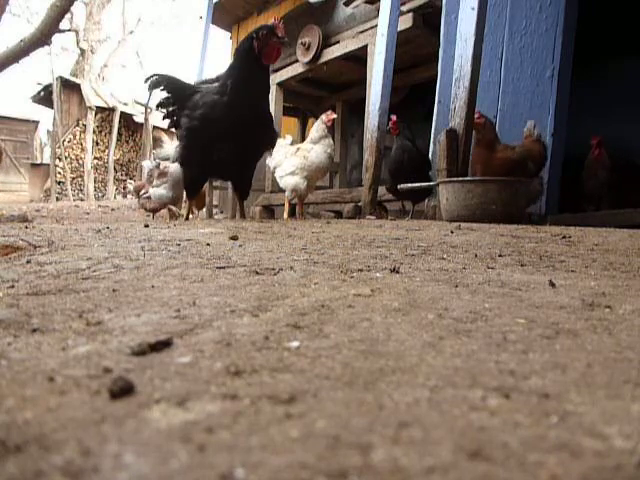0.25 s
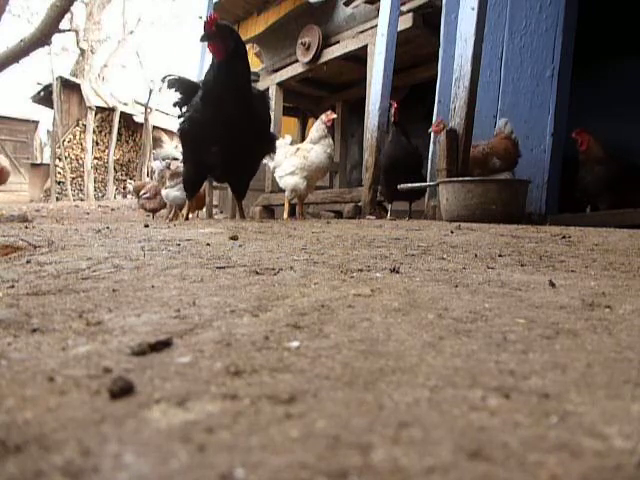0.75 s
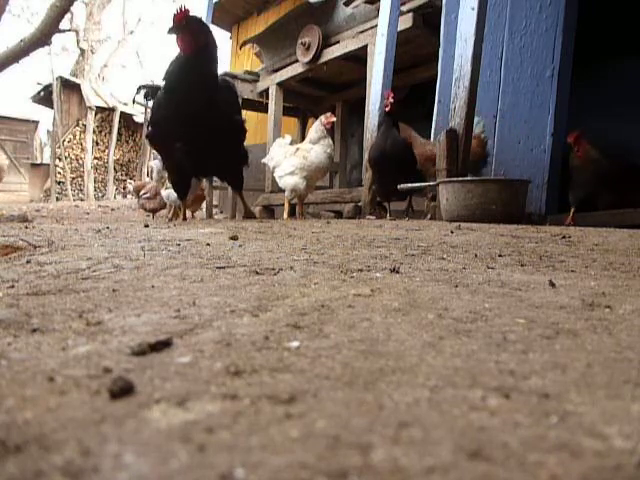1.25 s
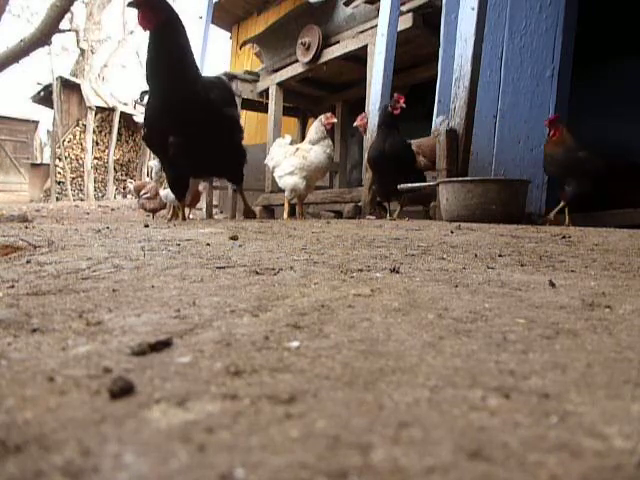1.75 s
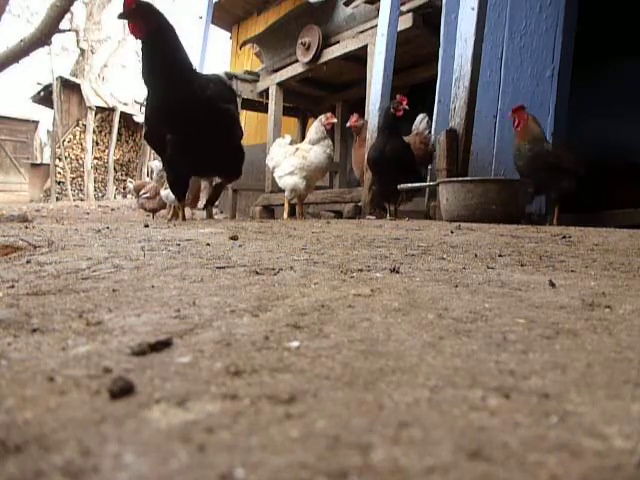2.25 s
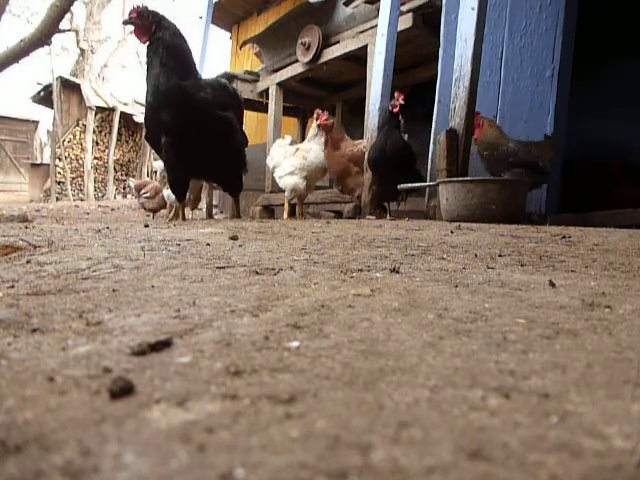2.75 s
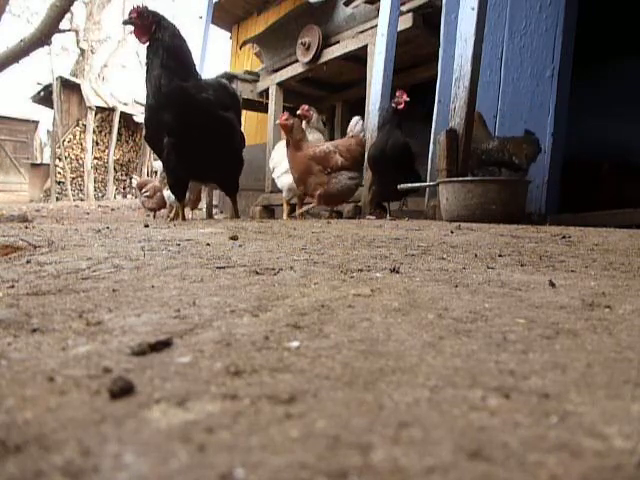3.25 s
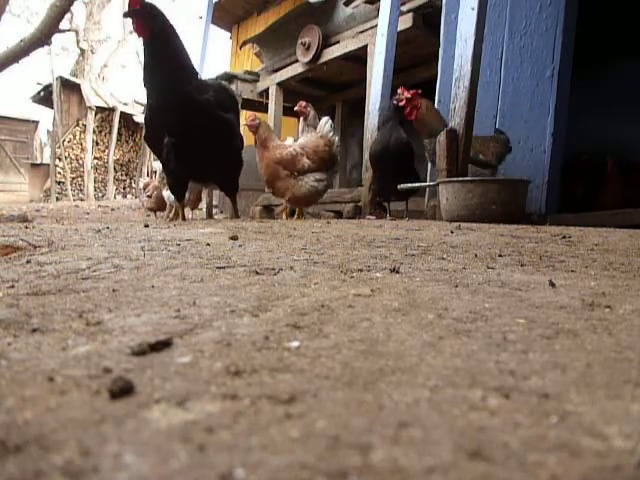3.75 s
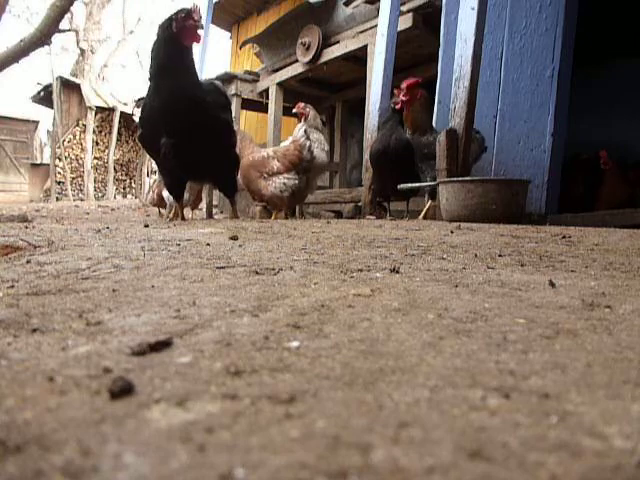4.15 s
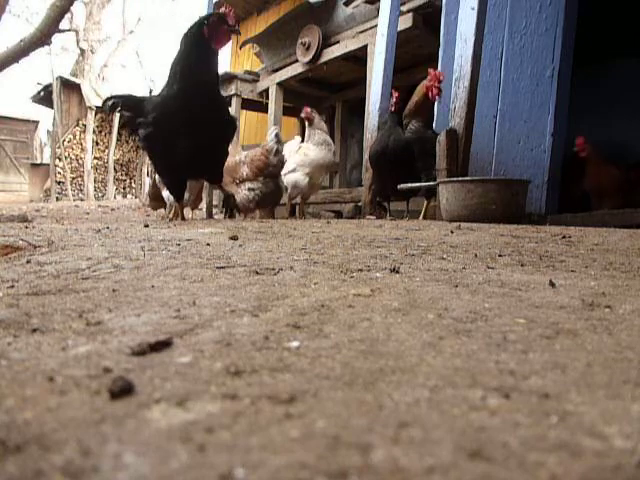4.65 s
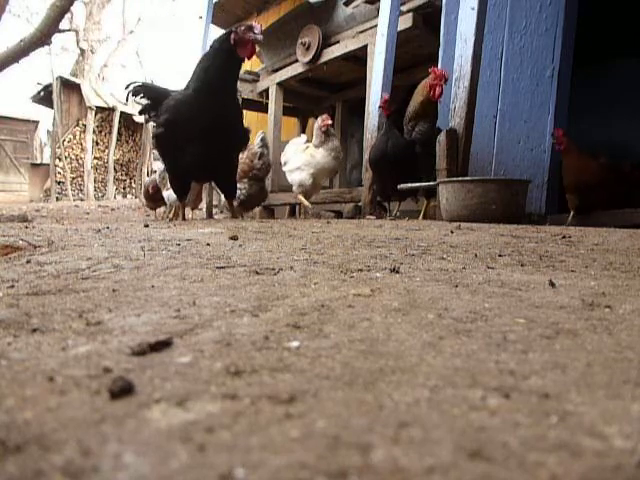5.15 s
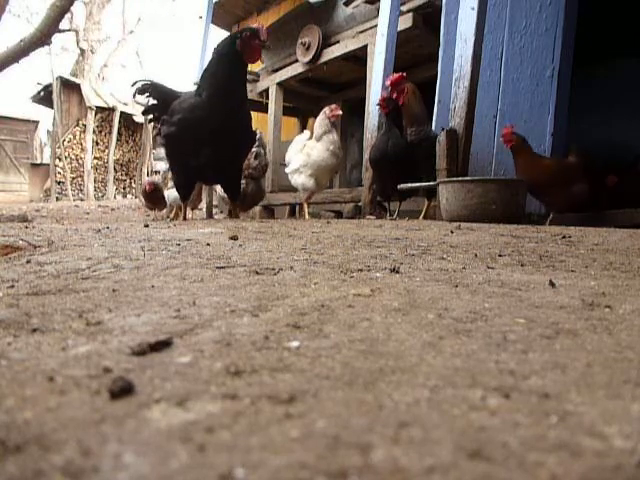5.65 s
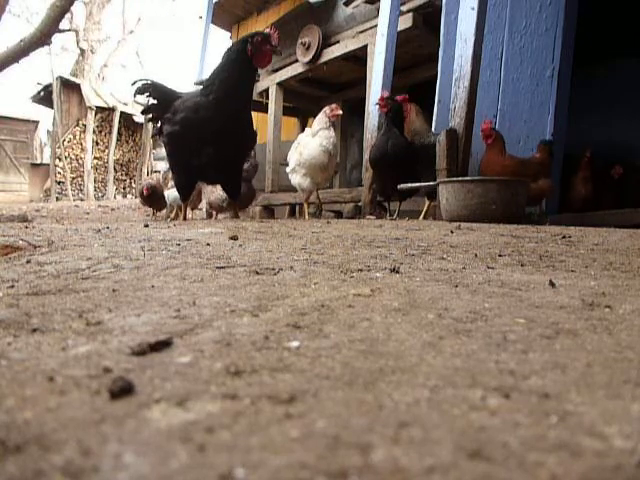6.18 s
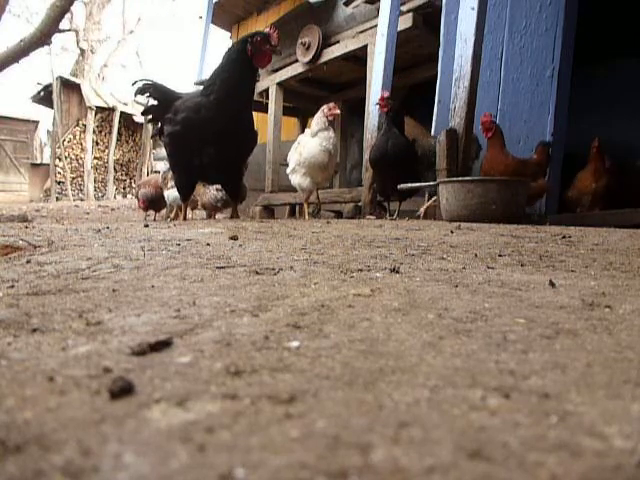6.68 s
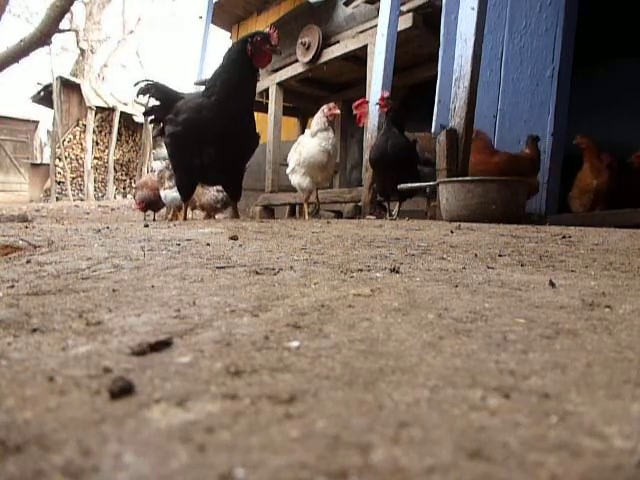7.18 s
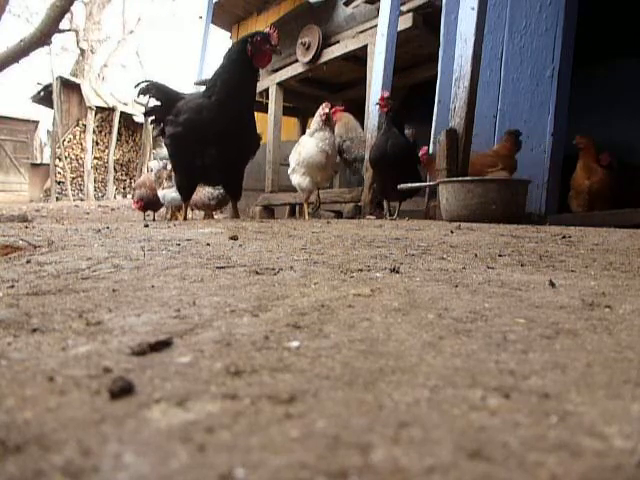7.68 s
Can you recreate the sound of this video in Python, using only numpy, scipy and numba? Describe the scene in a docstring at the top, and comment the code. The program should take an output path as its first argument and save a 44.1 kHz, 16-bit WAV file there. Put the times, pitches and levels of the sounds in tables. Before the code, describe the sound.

A flock of hens is heard at a few metres in a farmyard, over soft low rumble and very faint hiss. Nearly pure, trembling high calls stretch into three wavering moans, interrupted by throaty clucks. The second half is busier: low boks break upward into whines, a second hen groans, and loud quick clucks snap out under the eaves with short echoes. It thins to a last small cluck.

```python
"""Hens in a farmyard beside a shed, over a low outdoor rumble, a faint hiss and a faint drone, with echoes.
First come short whines, nearly pure trembling tones, and dry ticks of beaks and claws shaped from noise.
From 1.2 s one hen draws out three long moans; rough clucks, pulses through a throat, cut in from 1.7 s.
A thin peep sounds at 3 s. From 4.5 s whines often break upward out of a low 'bok', and another hen groans
under them from 5.4 s; a last cluck comes at 7.6 s. The camera's gain ducks for a moment after loud clucks.
"""
import sys
import numpy as np
from scipy import signal
from scipy.fft import rfft, irfft, next_fast_len
from scipy.io import wavfile
from scipy.ndimage import map_coordinates
from numba import njit

SR = 44100
rng = np.random.default_rng(int(sys.argv[2]) if len(sys.argv) > 2 else 0)


def generate_wav(signal):
    """Clip the signal to [-1, 1] and save it as 16-bit WAV at the path in sys.argv[1]."""
    frames = np.transpose(np.atleast_2d(signal))
    scaled = np.clip(frames, -1, 1) * 32767
    pcm = np.round(scaled).astype(np.int16)
    wavfile.write(sys.argv[1], SR, pcm)


N = 349404  # length of the scene in samples


def undb(db):
    """Decibels to gain."""
    return 10 ** (np.asarray(db) / 20)


def unit(x):
    """Scale to rms 1."""
    return x / np.sqrt(np.mean(x ** 2) + 1e-18)


def add(out, start_s, x):
    """Mix x into out from start_s."""
    i = int(start_s * SR)
    out[i:i + len(x)] += x[:N - i]


def curves(rows):
    """The columns after the time column, joined by straight lines from the first time to the last."""
    times, *columns = np.transpose(rows)
    t = np.arange(times[0], times[-1], 1 / SR)
    return [np.interp(t, times, column) for column in columns]


def walk(size, rate_hz):
    """Smooth chance with a spread of about 1 and rate_hz new values a second."""
    at = np.arange(size) * rate_hz / SR
    return map_coordinates(rng.standard_normal(2 ** 12), [at], order=3, mode='wrap')


def fade(size, edge_s):
    """A gate with rounded ends."""
    return signal.windows.tukey(size, min(1, 2 * edge_s * SR / size))


def resonance(hz, modes, order=4):
    """Complex gain at the frequencies hz of steep resonances, given as (Hz, width in Hz, dB)."""
    gain = 0
    for centre_hz, width_hz, db in modes:
        detuning = (hz ** 2 - centre_hz ** 2) / (2 * width_hz * (hz + 1))
        gain = gain + undb(db) / (1 + 1j * detuning) ** order
    return gain


def noise(size, colour):
    """Noise of rms 1 whose spectrum is the function colour(Hz)."""
    white = rng.standard_normal(max(size, SR // 2))[:size]
    length = next_fast_len(size)
    hz = np.arange(length // 2 + 1) * SR / length
    return unit(irfft(rfft(white, length) * colour(hz), length)[:size])


def voice(hz, modes, rough, count=12):
    """Syrinx pulses as a harmonic stack through the throat; roughness shakes their rate and size and adds air."""
    n = len(hz)
    shaken_hz = hz * (1 + 0.12 * rough * walk(n, 300))
    phase = 2 * np.pi * np.cumsum(shaken_hz) / SR
    harmonics = sum(resonance(k * hz, modes) * np.exp(1j * k * phase) for k in range(1, count + 1))
    tone = unit(harmonics.real)
    still = [(np.mean(f), w, np.mean(db)) for f, w, db in modes]  # moving resonances held at their mean
    puffs = 1 + 0.5 * np.cos(phase)  # one puff of air per cycle
    air = noise(n, lambda f: resonance(f, still)) * puffs
    return unit(tone * np.exp(0.5 * rough * walk(n, 250)) + 0.5 * rough * air)


def high_note(hz, db, second_db, depth):
    """The high register: nearly a sine, trembling in level and pitch, with weak hoarse overtones."""
    attack_s, release_s = 0.022, 0.027
    n = len(hz)
    t = np.arange(n) / SR
    gate = np.minimum(t / attack_s, t[::-1] / release_s).clip(0, 1)
    tremor = walk(n, 98.05)  # shared by level and pitch
    pitch_shake = depth * (0.03 * tremor + 0.069 * walk(n, 200))
    phase = 2 * np.pi * np.cumsum(hz * (1 + pitch_shake)) / SR
    second = np.sin(2 * phase + 0.6 * walk(n, 200))
    third = undb(-18.5) * np.sin(3 * phase + walk(n, 270))
    overtone_gain = undb(second_db) * np.exp(0.32 * walk(n, 120))
    # alternate cycles differ when the voice shakes
    half_line = depth * undb(-20) * walk(n, 98) * np.sin(3 * phase / 2)
    tone = np.sin(phase) + overtone_gain * (second + third) + half_line
    return unit(tone * np.exp(depth * tremor) * gate) * undb(db)


def yard(rumble_gain_db, hiss_gain_db, drone_db):
    """A low rumble and a smooth distant hiss, both moved by the camera's gain, and a faint low drone."""
    # Colour of the outdoor background. Each row: frequency in Hz, relative level in dB.
    spectrum = [(15, -51), (25, -26), (97, -7), (135, -5.5), (193, 0), (256, 0), (349, -4.5), (499, -13.5),
                (548, -10), (802, -17), (993, -22), (1200, -28.5), (4130, -41.5), (5620, -47.5),
                (7300, -63.5), (9490, -96), (16100, -120)]
    # Level of the background as the camera's gain rides up and down.
    # Each row: time in seconds, rumble level in dB before rumble_gain_db.
    gain_ride = [(0, -31.5), (.7, -29.5), (1.449, -26), (1.798, -31), (2.298, -31), (2.699, -33.5),
                 (3.499, -33.5), (4.0, -36), (5.649, -36), (6.2, -41), (7.92, -36.5)]
    # Narrow resonance of the drone. Each row: centre in Hz, width in Hz, level in dB.
    drone_modes = [(107.3, 13, 0)]
    hiss_follows = 0.83  # share of the gain ride's swings in dB that the hiss takes

    hz, db = np.transpose(spectrum)
    ride_db = np.interp(np.arange(N) / SR, *np.transpose(gain_ride))
    hiss_ride_db = hiss_follows * (ride_db - ride_db.mean())

    def colour(f):
        return undb(np.interp(np.log(f + 1), np.log(hz), db))

    def low_share(f):  # power share of the rumble; the hiss takes the rest
        return 1 / (1 + (f / 1100) ** 4)

    rumble = noise(N, lambda f: colour(f) * np.sqrt(low_share(f)))
    rumble = rumble * undb(ride_db + 1.2 * walk(N, 16))  # with a slight flutter
    hiss = noise(N, lambda f: colour(f) * np.sqrt(1 - low_share(f)))
    hiss = hiss * undb(hiss_ride_db + 0.6 * walk(N, 22))
    drone = noise(N, lambda f: resonance(f, drone_modes))
    return undb(rumble_gain_db) * rumble + undb(hiss_gain_db) * hiss + undb(drone_db) * drone


def peep(start_s, length_s, first_hz, last_hz, db):
    """A young bird's thin, faint whistle: one sine gliding slightly down."""
    out = np.zeros(N)
    hz = np.linspace(first_hz, last_hz, int(length_s * SR))
    whistle = np.sin(2 * np.pi * np.cumsum(hz) / SR)
    add(out, start_s, whistle * fade(len(hz), 0.014) * undb(db))
    return out


def pecks():
    """Beaks and claws on hard ground: dry gritty noise ticks that die in some hundredths of a second."""
    # Each row: start in seconds, level at the onset in dB.
    ticks = [(0.202, -43.5), (0.411, -50), (2.116, -35.5), (3.971, -47), (4.457, -46), (4.489, -45),
             (4.968, -45.5), (5.047, -47.5), (5.176, -45), (6.399, -50)]
    # Ring of the struck ground. Each row: centre in Hz, width in Hz, level in dB.
    ring = [(2390, 360, 11), (3230, 2000, 10), (5330, 4900, -15)]
    out = np.zeros(N)
    t = np.arange(SR // 10) / SR
    for start_s, db in ticks:
        grit = noise(len(t), lambda f: resonance(f, ring))
        add(out, start_s, grit * np.exp(-t / 0.016) * undb(db))
    return out


def groan():
    """A second hen's low creaking call: throat-shaped pulses whose pitch drops by a step and comes back."""
    # Course of the call. Each row: time in seconds, pitch in Hz, level in dB.
    course = [(5.41, 290.6, -39.5), (5.461, 286.6, -32), (5.519, 264, -29), (5.625, 265.9, -20),
              (5.648, 205.5, -38.5), (5.69, 199.8, -26.5), (5.77, 205.6, -34.5), (5.801, 253.8, -24.5),
              (5.864, 280, -19.5)]
    # Throat resonances. Each row: centre in Hz, width in Hz, level in dB.
    throat = [(565, 74, 2.5), (732, 175, 6), (414, 198, -2.5), (1700, 300, -25)]
    out = np.zeros(N)
    hz, db = curves(course)
    call = voice(hz, throat, rough=0.15, count=12)
    add(out, course[0][0], call * undb(db) * fade(len(hz), 0.0072))
    return out


def clucks():
    """A rough burst: pitch and throat resonance rise together while the beak snaps open and shut."""
    # Each row: start in seconds, length in seconds, first pitch in Hz, last pitch in Hz,
    # throat resonance at the middle in Hz, burst level in dB, windpipe gain in dB, beak gain in dB,
    # roughness from 0 to 1.
    bursts = [(1.655, 0.031, 202, 237, 403, -13, -12, -24.5, 0.56),
              (1.685, 0.0099, 257, 268, 515, -8, -12, -19.5, 0),
              (1.909, 0.03, 153.8, 196.7, 396, -18, -14.5, -19, 0.63),
              (1.926, 0.031, 271.6, 280.7, 590, -23.5, -10.5, -13, 0.16),
              (3.413, 0.035, 169, 206.5, 380, -21.5, -13, -24, 0.53),
              (3.435, 0.019, 242, 264, 490, -18, -22.5, -30, 0.1),
              (3.571, 0.032, 160, 181, 380, -20.5, -18.5, -28.5, 0.56),
              (5.857, 0.037, 328.2, 487.4, 592, -13, -7.5, -8, 0.27),
              (6.013, 0.031, 343, 390, 730, -34.5, -19, -16, 0.42),
              (6.031, 0.035, 407, 495, 597, -17, -1.5, -2, 0.77),
              (6.231, 0.0386, 284.5, 439.7, 620, -18.5, -2, -1.5, 0.44),
              (6.581, 0.042, 209.5, 219.4, 533, -18.5, -6, -16.5, 0.4),
              (6.61, 0.024, 206, 234, 700, -34.5, -11.5, -10.5, 0.65),
              (6.714, 0.055, 176.7, 270.6, 436, -25.5, -11.5, -24, 0.54),
              (7.625, 0.0557, 215.6, 272.7, 494, -28, -11.5, -24, 0.64)]
    # Resonances of windpipe, open beak and air rush. Each row: centre in Hz, width in Hz, relative level in dB.
    windpipe = [(1116, 235, -3), (2167, 360, -13)]
    open_beak = [(3086, 500, -13), (5370, 800, -37), (7050, 600, -41)]
    rasp_modes = [(1780, 760, 6), (5530, 2000, -19)]
    throat_width = 0.49  # share of the throat's middle frequency
    rasp_db = -22.5  # against the voice, at the widest beak

    out = np.zeros(N)
    treble_split = signal.butter(2, 1500, fs=SR, output='sos')
    for start_s, length_s, first_hz, last_hz, throat_hz, db, pipe_db, beak_db, rough in bursts:
        u = np.linspace(0, 1, int(length_s * SR))
        push = np.sin(np.pi * u).clip(0)  # breath and beak opening
        hz = first_hz + (last_hz - first_hz) * u ** 0.716
        modes = [(throat_hz * (1 + 0.12 * (u - 0.5)), throat_width * throat_hz, 0)]
        modes += [(f, w, d + pipe_db) for f, w, d in windpipe]
        modes += [(f, w, d + beak_db) for f, w, d in open_beak]
        burst = voice(hz, modes, rough, count=32)
        dull = signal.sosfiltfilt(treble_split, burst)
        burst = dull + (burst - dull) * push  # the treble only gets out while the beak is wide
        rasp = noise(len(u), lambda f: resonance(f, rasp_modes))
        burst = burst + undb(rasp_db) * push * rasp
        add(out, start_s, unit(burst * push ** 0.75) * undb(db))
    return signal.sosfilt(signal.butter(2, 140, 'high', fs=SR, output='sos'), out)


def boks():
    """The low register: a short note that slides, mostly up, and brightens as the beak opens."""
    # Each row: start in seconds, length in seconds, first pitch in Hz, last pitch in Hz, level in dB,
    # overtone gain in dB before the opening of the beak.
    notes = [(0.257, 0.061, 813, 698, -35.5, -22), (2.564, 0.037, 612, 698, -44, 35),
             (2.819, 0.046, 737, 790, -33, -19), (3.161, 0.028, 740, 720, -38, -18.5),
             (3.541, 0.055, 738, 650, -35, -13), (4.542, 0.035, 490, 734, -30, -1),
             (4.84, 0.044, 605, 673, -24.5, 0), (5.02, 0.027, 535, 766, -26, -2),
             (5.292, 0.044, 598, 721, -23, 0), (5.469, 0.044, 559, 714, -24, 1.5),
             (5.736, 0.046, 580, 703, -21.5, 1), (6.294, 0.045, 652, 741, -30, -7),
             (6.748, 0.064, 632, 663, -27.5, -4), (6.807, 0.094, 760, 824, -32, 1),
             (7.242, 0.066, 612, 736, -30.5, -1.5)]
    # Throat and beak resonances. Each row: centre in Hz, width in Hz, relative level in dB.
    throat = [(650, 240, 0)]
    half_open_beak = [(1408, 280, -5), (1770, 350, -16.5), (3330, 1500, -33)]
    out = np.zeros(N)
    for start_s, length_s, first_hz, last_hz, db, over_db in notes:
        u = np.linspace(0, 1, int(length_s * SR))
        hz = first_hz + (last_hz - first_hz) * u ** 0.76
        opening_db = over_db + 10 * np.log10(0.05 + 1.6 * u)
        modes = throat + [(f, w, d + opening_db) for f, w, d in half_open_beak]
        note = voice(hz, modes, rough=0.26, count=6)
        note = note * fade(len(u), 0.0094) * undb(-4 * u)
        add(out, start_s, unit(note) * undb(db))
    return out


def whines():
    """Short high notes: the pitch bends mid-note, mostly down, and recovers while the level swells or sinks."""
    # Each row: start in seconds, length in seconds, first pitch in Hz, last pitch in Hz, mid-note sag in Hz,
    # level in dB, swell over the note in dB, mean second harmonic in dB, tremble in nepers.
    notes = [(0.223, 0.23, 881, 936, 11, -30, 11, -15.5, 0.29),
             (0.477, 0.15, 850, 933, 4.5, -37, -5, -14.5, .35),
             (0.708, 0.091, 938, 912, 26, -30.5, 1.5, -25.5, 0.4),
             (1.106, 0.11, 992, 1038, 11, -38, 7, -19.5, 0.41),
             (2.797, 0.18, 944, 1013, 9, -29, 19, -19.5, .25),
             (3.071, 0.066, 907, 951, 15, -25, 8, -29, 0.27),
             (4.564, .115, 951, 915.5, -21.5, -24.5, -3.5, -20, 0.29),
             (4.673, 0.0864, 900, 983, 11, -23, 9, -26.5, .3),
             (4.867, 0.067, 1018, 990, 9, -32.5, 3.5, -22, 0.21),
             (5.032, 0.17, 971, 1044, 54, -26, 3, -18, 0.54),
             (5.305, 0.049, 968, 1020, -9.5, -27.5, -3, -17, 0.75),
             (5.52, .135, 943, 1032, 26, -25, -4.5, -17, 0.35),
             (5.78, 0.0834, 936, 995, 32, -27, 17.5, -14, 0.3),
             (6.323, .11, 978, 1003, 19.5, -24.5, -1, -26, 0.15),
             (6.858, 0.3, 1007, 1021, 17, -20, 5, -25.5, 0.18),
             (7.264, 0.052, 1015, 1015, -3.5, -25, -3, -19, 0.36)]
    out = np.zeros(N)
    for start_s, length_s, first_hz, last_hz, sag_hz, db, swell_db, second_db, depth in notes:
        u = np.linspace(0, 1, int(length_s * SR))
        hz = first_hz + (last_hz - first_hz) * u - sag_hz * np.sin(np.pi * u)
        add(out, start_s, high_note(hz, db + swell_db * (u - 0.5), second_db, depth))
    return out


def moans():
    """Long high notes that get hoarser where they tremble."""
    # Three drawn-out notes, one curve each. Each row: time in seconds, pitch in Hz, level in dB,
    # tremble in nepers.
    long_notes = [
        [(1.215, 887.4, -24.5, 0.18), (1.247, 890.8, -22, 0.22), (1.291, 878.3, -31, 0.18),
         (1.333, 866.6, -23.5, 0.26), (1.371, 877.5, -33, 0.22), (1.409, 877.5, -25, 0.22),
         (1.453, 876.3, -31.5, 0.22), (1.519, 898.7, -16.5, 0.11), (1.575, 898.5, -20.5, 0.18),
         (1.595, 942.7, -26, 0.25), (1.62, 941.8, -24, 0.22)],
        [(2.015, 1007, -36, 0.22), (2.035, 1007, -31, 0.25), (2.113, 975.0, -37.5, 0.31),
         (2.193, 920.0, -24, 0.26), (2.245, 921.4, -19.5, 0.21), (2.273, 919.1, -28.5, 0.3),
         (2.345, 928.1, -21.5, 0.2), (2.441, 1007, -28, 0.49), (2.457, 955.6, -23, 0.32),
         (2.561, 925.4, -17, 0.18), (2.59, 935.0, -22, 0.26)],
        [(3.612, 971.8, -27, 0.14), (3.73, 976.9, -27, 0.13), (3.804, 940.0, -26.5, 0.27),
         (3.894, 945.4, -26, 0.32), (3.992, 971.2, -21.5, 0.23), (4.002, 1021, -28, 0.18),
         (4.014, 938.4, -28.5, 0.25), (4.084, 950.0, -23, 0.22), (4.146, 908.3, -22.5, 0.18),
         (4.416, 956.0, -21, 0.21), (4.47, 969.0, -27, 0.44)],
    ]
    steady_second_db = -38.5  # second harmonic of a steady voice
    hoarse_db_per_neper = 51  # its rise as the voice shakes
    out = np.zeros(N)
    for course in long_notes:
        hz, db, depth = curves(course)
        second_db = steady_second_db + hoarse_db_per_neper * depth
        add(out, course[0][0], high_note(hz, db, second_db, depth))
    return out


def shed(x, early_db, early_t60_s, tail_db):
    """Close scatter from the boards and eaves, then a weaker tail from the walls round the yard."""
    t = np.arange(SR // 2) / SR
    response = 0
    for t60_s, build_s, db in [(early_t60_s, 0.0065, early_db), (0.42, 0.0083, tail_db)]:
        scatter = noise(len(t), lambda f: 1 / (1 + (f / 6500) ** 2))
        decay = np.exp(-np.log(1000) * t / t60_s)
        scatter = scatter * decay * (1 - np.exp(-t / build_s))
        response = response + unit(scatter) / np.sqrt(len(t)) * undb(db)  # db is the echo's total energy
    return signal.fftconvolve(x, response)[:N]


@njit
def follow(size, rise, fall):
    """The gain control's envelope: it climbs fast and sinks slowly."""
    out, e = np.empty(len(size)), 0.
    for i in range(len(size)):
        e += (size[i] - e) * (rise if size[i] > e else fall)
        out[i] = e
    return out


def scene():
    """The flock, its echo and the background; the clucking bird stands under the eaves and rings more."""
    background = yard(rumble_gain_db=0.5, hiss_gain_db=-44.0, drone_db=-48.5)
    yard_birds = peep(3.0, length_s=0.12, first_hz=2650, last_hz=2620, db=-50.5)
    yard_birds = yard_birds + pecks() + groan() + boks() + whines() + moans()
    shed_bird = clucks()
    echoes = shed(yard_birds, early_db=-12.5, early_t60_s=0.13, tail_db=-22)
    echoes += shed(shed_bird, early_db=-11.5, early_t60_s=0.17, tail_db=-19)
    return (background + yard_birds + shed_bird + echoes)[None]


def record(dry):
    """The camera ducks its gain when the envelope passes a threshold and cuts steeply above about 7 kHz."""
    limit_db, attack_s, release_s = -11, 0.0014, 0.14
    top_hz = 7150
    envelope = follow(np.abs(dry[0]), 1 / (attack_s * SR), 1 / (release_s * SR))
    limited = dry / np.maximum(1, envelope / undb(limit_db))
    return signal.sosfilt(signal.ellip(8, 0.3, 70, top_hz, fs=SR, output='sos'), limited)


dry = scene()
out = record(dry)
generate_wav(out)
```